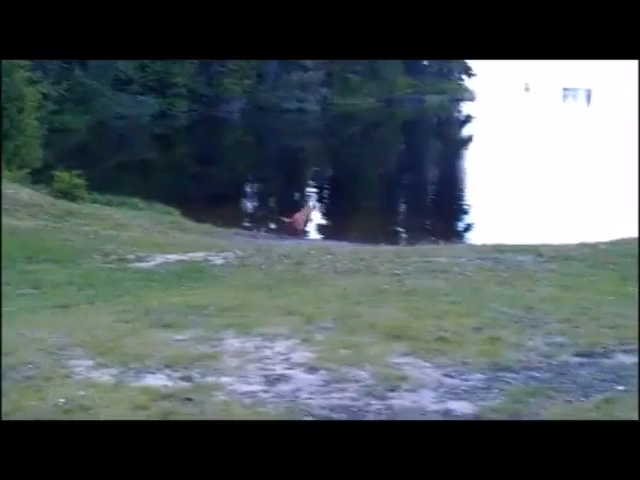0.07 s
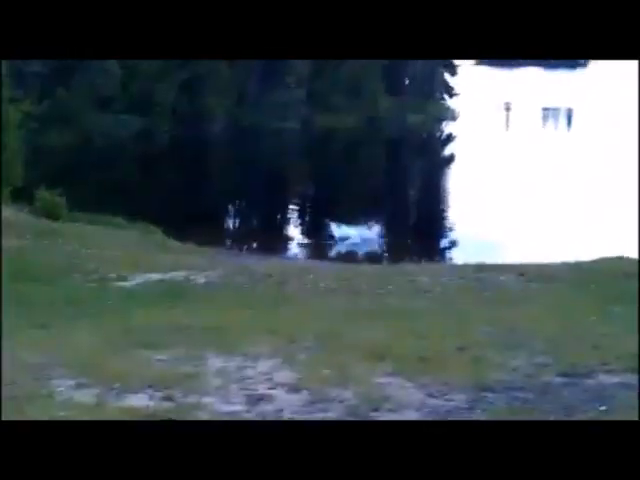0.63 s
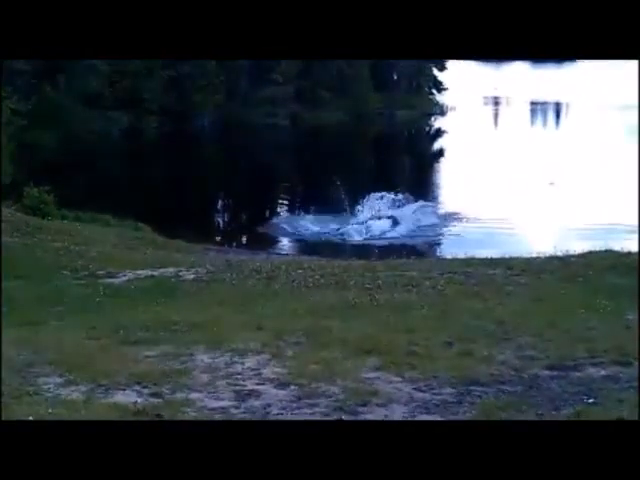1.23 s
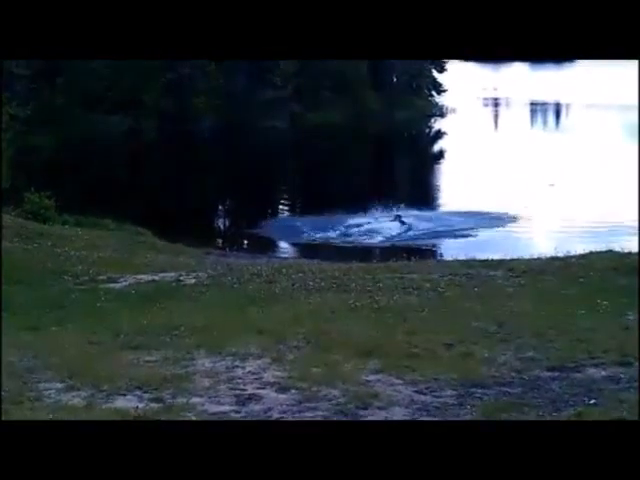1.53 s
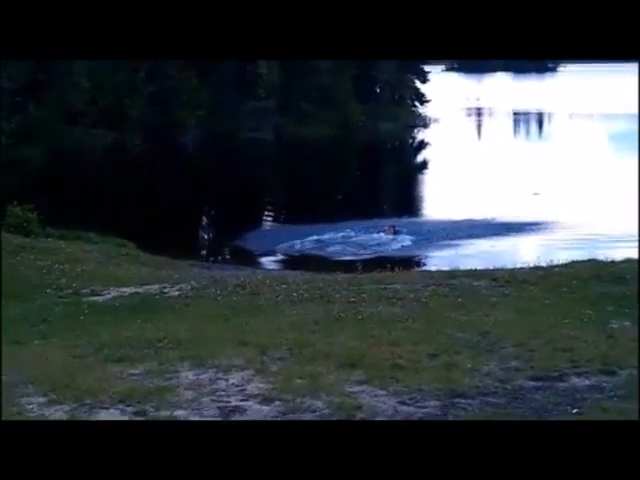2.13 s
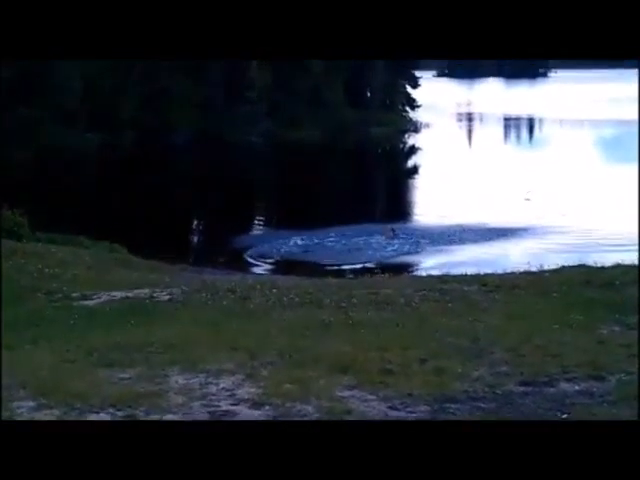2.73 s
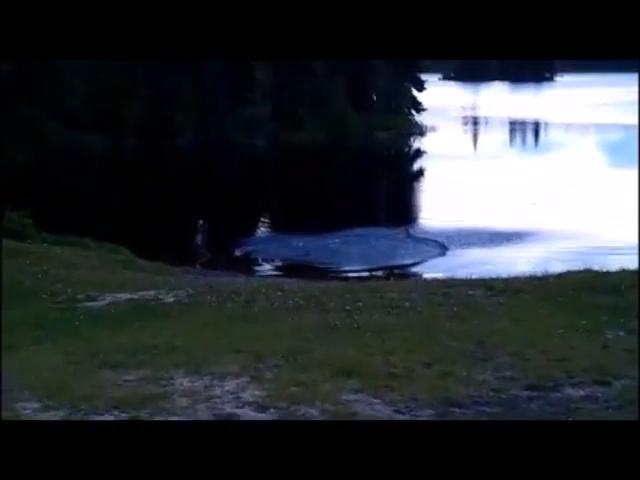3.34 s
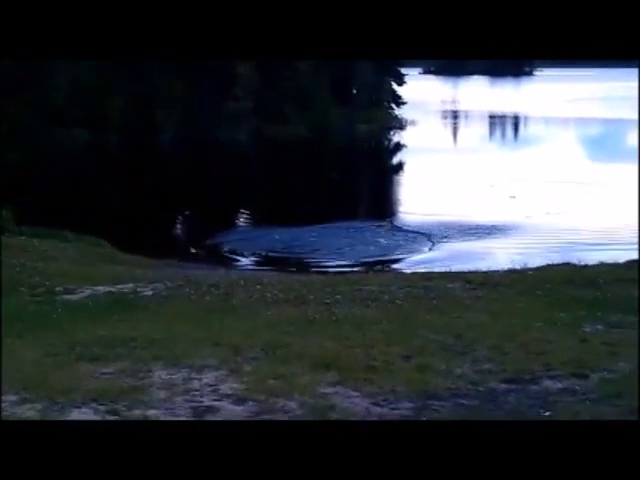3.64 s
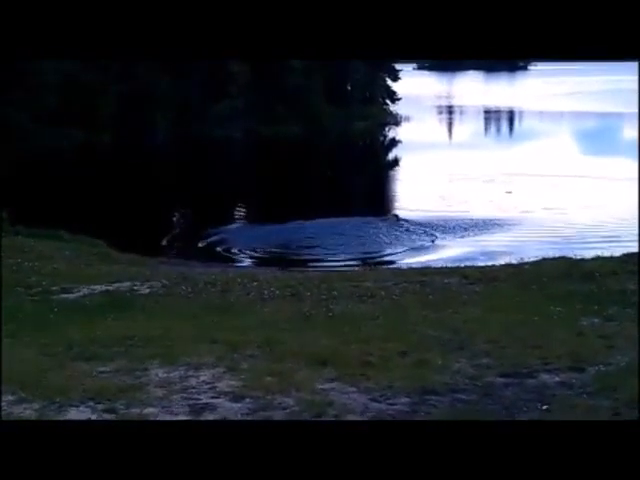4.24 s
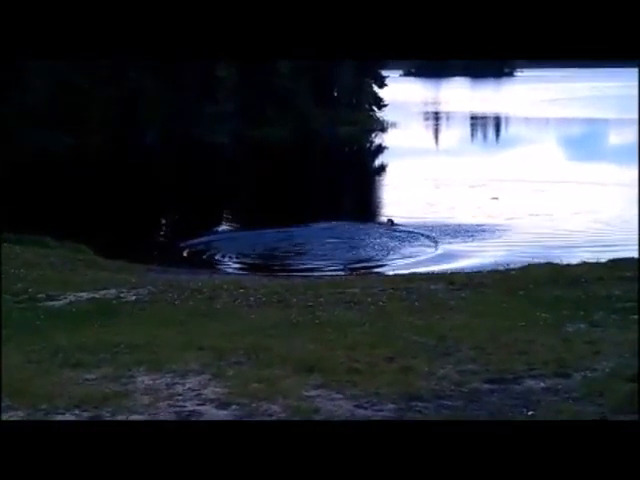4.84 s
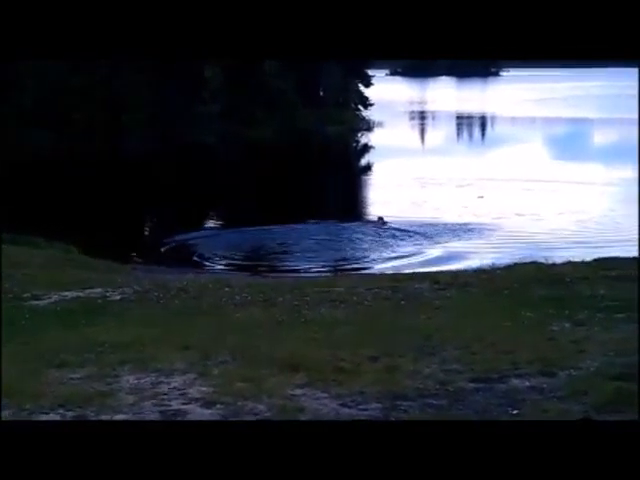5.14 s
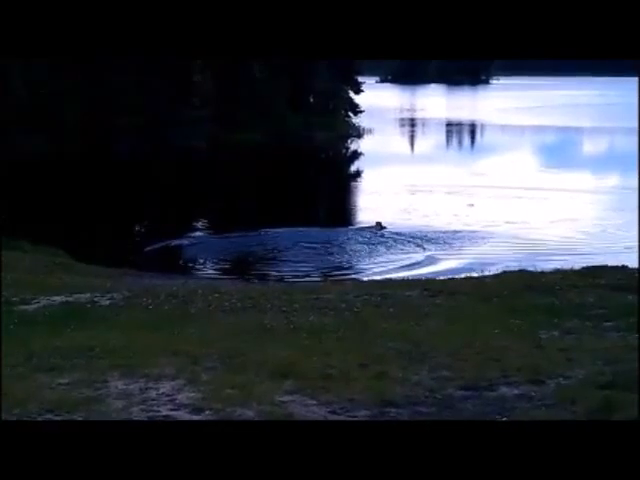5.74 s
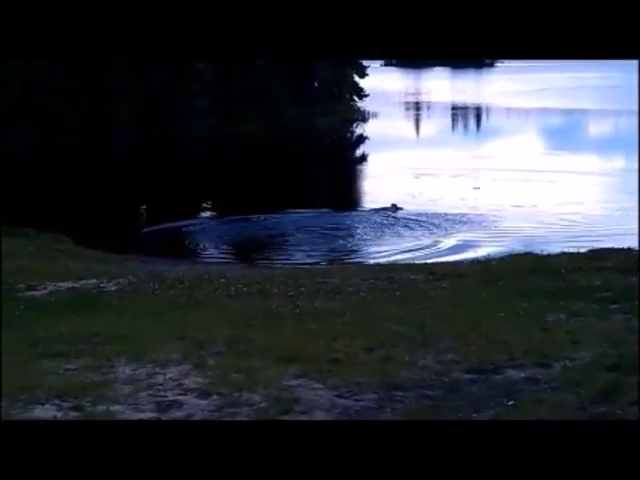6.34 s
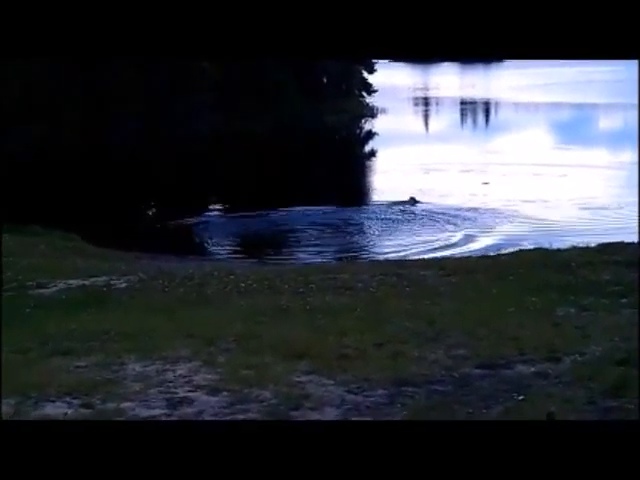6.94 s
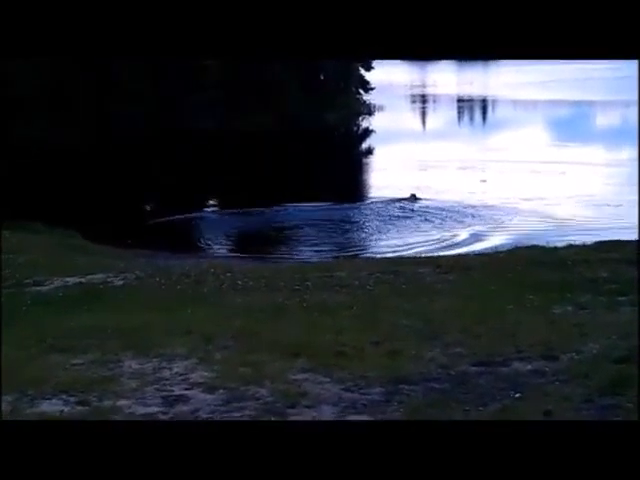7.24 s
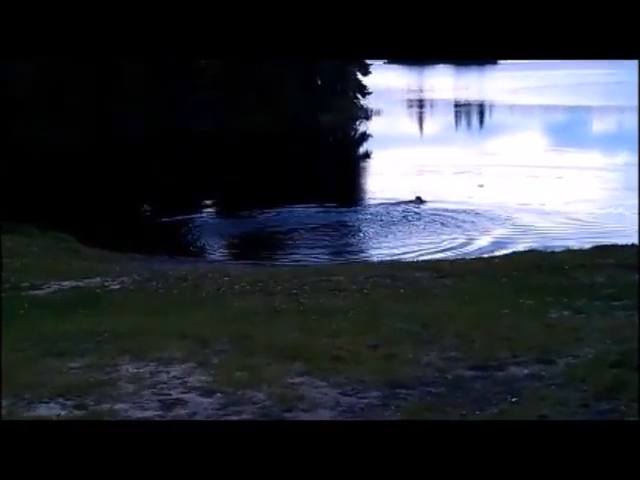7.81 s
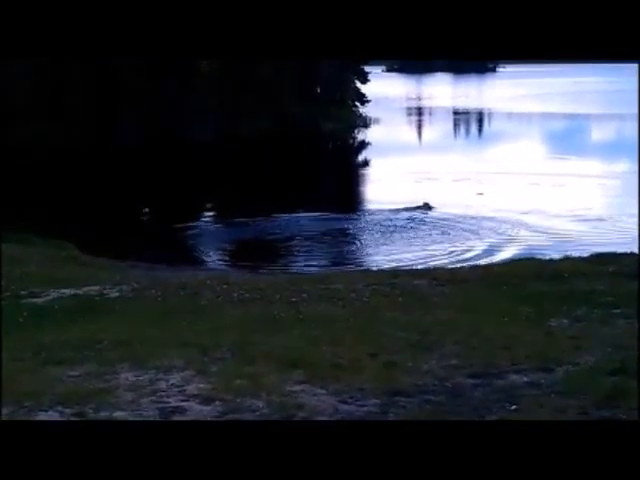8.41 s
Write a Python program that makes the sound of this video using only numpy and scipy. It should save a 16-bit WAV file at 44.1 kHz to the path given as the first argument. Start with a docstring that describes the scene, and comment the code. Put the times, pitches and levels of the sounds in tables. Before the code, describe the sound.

A very quiet outdoor hush lies over a lake, heard from the shore. In the first half second there are faint swishes and a drip or two as a dog runs through the shallows some way off. At about 0.8 seconds it hits the water with a quick cluster of slaps, followed by low, hollow gulps and gurgling. The thrown water rains back as bright spray, building from 1.4 seconds and loudest between 1.5 and 2 seconds, with a few sharp smacks. The spray and bubbling then thin out, and the level drops abruptly at about 2.7 seconds with a few last glugs. Drips and fizzing foam fade by 4 seconds. From around 3 seconds until the end, near 8.5 seconds, the dog swims away with faint, uneven paddling, soft ripples and scattered small, high plips and ticks.

```python
"""A dog leaps into a forest lake

Some way off, a dog bounds through the shallows and leaps. Its body slaps the surface and opens a gulping
cavity; the sheet of water it throws up rains back as spray. Each trapped bubble rings as a damped
oscillator, the smaller the higher. The level drops abruptly, and the dog swims off: soft paddling wash,
ripples and single plips over a very quiet outdoor hush."""
import sys
import numpy as np
from scipy import signal
from scipy.fft import rfft, irfft, next_fast_len
from scipy.io import wavfile
from scipy.ndimage import map_coordinates

SR = 44100
rng = np.random.default_rng(int(sys.argv[2]) if len(sys.argv) > 2 else 0)


def unload_audio(sound):
    """Save the sound as a 16-bit wav file, at the path given as the first command line argument."""
    columns = np.transpose(np.atleast_2d(sound))
    # keep every value between -1 and 1, then stretch to whole-number steps
    steps = np.round(np.clip(columns, -1, 1) * 32767)
    wavfile.write(sys.argv[1], SR, steps.astype(np.int16))


N = 373527
TIME = np.arange(N) / SR

# Spectra of still air, calm water and the splash. Each row: frequency in Hz, gain in dB.
HUSH_TONE = [(25, -15.5), (80, -20), (130, -41), (200, -24), (290, -4), (480, -2.5), (750, 3), (1100, -1.5),
             (2000, 0), (3000, -3), (4000, -4), (10500, -15.5)]
RIPPLE_TONE = [(150, -47.5), (230, -24), (310, -8.5), (540, -8), (770, 0.2), (980, -6.5), (1500, -6),
               (2080, -2.1), (3080, -9.5), (3950, -2.5), (6200, -9.5), (7700, -12), (8600, -12.5),
               (10500, -30.5)]
SPLASH_TONE = [(120, -50), (190, -28), (290, -11), (440, -10.5), (590, -4), (720, 1.2), (830, -0.6),
               (930, -8.5), (1550, -5.5), (2100, -0.5), (2500, -5), (2850, -6), (3090, -11.5), (3290, -5),
               (3900, -1), (5100, -3), (6100, -3.5), (6850, -6.5), (7400, -2.5), (7850, -10), (8250, -5.5),
               (9000, -9.5), (9500, -10.5), (10100, -20.5)]
# Likeness of the two microphone ports. Each row: frequency in Hz, correlation before scaling.
CORRELATION = [(300, 0.5), (750, 0.55), (1050, 0.55), (1650, 0.5), (2200, 0.77), (2800, 0.47), (3100, 0.07),
               (4400, 0.4), (5900, 0.43), (7800, -0.12), (9000, 0.48)]
# Imbalance of the ports. Each row: frequency in Hz, left minus right in dB.
BALANCE = [(300, 2), (1300, 3.2), (2900, 1.5), (3700, 5.7), (5000, 1.3), (6200, 0.5), (8000, 0.5)]
# Spray kicked up in the shallows. Each row: start in seconds, length in seconds, level in dB.
KICKS = [(0.269, 0.021, -68.5), (0.36, 0.11, -74)]
# Legs pushing water. Each row: start in seconds, length in seconds, wash in dB, fizz in dB.
STROKES = [(-0.03, 0.064, -72.5, -77.5), (0.243, 0.13, -76, -76), (0.367, 0.053, -71, -75),
           (3.18, 0.41, -73, -69), (3.508, 0.31, -69, -69), (3.83, 0.57, -68.5, -71.5),
           (4.624, 0.04, -78, -74), (4.795, 0.28, -68, -70.5), (5.173, 0.04, -73, -77),
           (5.273, 0.11, -67.5, -74.5), (5.41, 0.22, -69, -73.5), (5.854, 0.041, -69, -70.5),
           (6.044, 0.09, -69.5, -72), (6.22, 0.066, -71.5, -73.5), (6.37, 0.27, -71.5, -76),
           (6.837, 0.39, -70, -73.5), (7.415, 0.079, -68.5, -74), (7.754, 0.056, -69, -73),
           (7.912, 0.32, -66, -72), (8.24, 0.25, -69.5, -74.5)]
# Single drops and bursting bubbles. Each row: start in seconds, level in dB, pitch in Hz,
# spatter t60 in seconds, ring relative to spatter in dB.
PLIPS = [(0.228, -59.5, 1310, 0.027, -4), (0.6245, -58, 1690, .014, 6), (2.889, -46, 2180, .05, -4),
         (2.902, -51, 2000, .03, -6), (3.13, -55, 6700, .02, 14), (3.207, -50, 2000, .025, 10),
         (3.503, -46, 4000, 0.064, -4), (3.644, -49, 1950, 0.023, 6), (4.067, -51, 2260, .018, 5),
         (4.152, -50, 2310, 0.039, -2), (4.2975, -48, 3550, 0.0099, -13), (4.312, -50.5, 2860, .035, -4),
         (4.322, -54, 4280, .022, 1), (4.36, -52, 2370, .014, 3), (4.375, -53.5, 1750, .02, 18),
         (4.433, -56, 5000, .025, 5), (4.661, -48, 4410, .035, 17), (4.683, -56.5, 4600, .02, 14),
         (4.76, -55.5, 5130, .015, 14), (4.889, -55, 4230, .025, 9), (4.921, -52, 1740, .018, 8),
         (4.9325, -46.5, 1850, .03, 23), (4.937, -46.5, 3780, .018, 26), (4.956, -53, 4100, .015, 5),
         (5.031, -53, 2290, .014, -9), (5.1482, -50.5, 4640, .011, 3), (5.1515, -50.5, 4040, .015, 14),
         (5.272, -53, 1900, 0.016, 6), (5.279, -52, 4700, .017, 8), (5.331, -51, 3600, .026, -5),
         (5.379, -55, 2600, .018, -2), (5.589, -59, 2090, .02, 6), (5.598, -55, 1910, .02, 0),
         (5.61, -53, 3730, .02, 12), (5.748, -61, 4200, .05, 0), (5.869, -57, 4680, .025, 14),
         (5.8984, -54.5, 4500, .035, -5), (5.925, -56, 4500, .04, 7), (6.089, -55, 3950, .02, 14),
         (6.131, -55, 3410, .02, 12), (6.246, -57, 2920, .025, 10), (6.344, -56, 4560, .02, 16),
         (6.5146, -48, 3200, 0.026, -13), (6.529, -53, 2610, 0.022, 4), (6.603, -54, 3770, .019, 5),
         (6.894, -53.5, 2530, .025, 16), (7.0115, -50, 1950, .02, 27), (7.168, -54, 1990, .02, 20),
         (7.208, -52, 4660, .014, 9), (7.225, -56, 5000, .014, 10), (7.457, -54.5, 2280, .02, 18),
         (7.748, -53, 2370, .02, 8), (7.753, -48.5, 3400, .034, 5), (7.7807, -50.5, 3570, .03, 12),
         (8.1467, -52.5, 1250, .016, 6.5), (8.204, -55, 2010, .02, 14.5), (8.4253, -52.5, 4500, .03, 8.5)]
# Air pockets closing. Each row: start in seconds, level in dB, pitch in Hz, relative ring in dB.
GLUGS = [(0.885, -35.5, 625, 15), (0.973, -37, 800, 10), (1.32, -41, 715, 17), (1.666, -32.5, 710, 14),
         (1.748, -39, 482, 8), (2.685, -40, 806, 13), (2.707, -44, 692, 16), (2.797, -51.5, 704, 7),
         (2.946, -48.5, 790, 19), (3.022, -54, 715, 21), (5.344, -59, 760, 12), (7.014, -61, 670, 14),
         (7.13, -63, 700, 12), (7.808, -62, 652, 14), (8.109, -62, 850, 11.5)]
# Deep gulps of the cavity. Each row: start in seconds, level in dB.
GULPS = [(0.785, -74), (0.875, -54.5), (0.94, -52), (1.045, -53), (1.115, -49), (1.18, -56), (1.36, -55),
         (1.73, -59), (1.935, -53)]
# Envelope of the gurgling in churned water. Each row: time in seconds, level in dB.
GURGLE = [(0.785, -68.5), (0.86, -56), (0.885, -46), (0.92, -50.5), (0.96, -44), (1.1, -50), (1.3, -53.5),
          (1.45, -47.5), (1.62, -44), (1.82, -43.5), (1.92, -38), (2.0, -42.5), (2.1, -46), (2.19, -41.5),
          (2.26, -47.5), (2.7, -56)]
# Envelope of thrown water falling back. Each row: time in seconds, level in dB.
SPRAY = [(0.795, -51.5), (0.93, -45.5), (1.1, -49.5), (1.3, -46.5), (1.47, -38), (1.59, -34), (1.69, -36),
         (1.87, -29.5), (1.97, -29), (2.03, -32), (2.07, -37.5), (2.3, -42.5), (2.707, -50)]
# Slabs of water landing. Each row: start in seconds, level in dB, pitch in Hz, relative ring in dB.
SMACKS = [(1.560, -9, 6240, 17), (1.577, -23, 4010, 0), (1.745, -21, 5600, -2.5), (1.971, -13.5, 6000, 12)]
# Paws and chest hitting the lake. Each row: start in seconds, level in dB, thrown spray in dB.
BLOWS = [(0.779, -50.5, -60), (0.822, -31, -43), (0.868, -28, -38), (0.89, -34, -40.5), (0.971, -24.5, -46),
         (1.003, -31, -57)]

SPLASH_SPAN_S = (.7, 2.85)
LEVEL_DROP_S = SPRAY[-1][0]  # the whole sound abruptly drops in level
SPRAY_EDGE_S = 0.0087  # fade at either end of the spray's envelope


def amp(db):
    """Amplitude ratio of a level in decibels."""
    return 10 ** (np.asarray(db) / 20)


def unit(x):
    """Normalisation to an rms of 1."""
    return x / np.sqrt(np.mean(x ** 2) + 1e-20)


def along(points, hz):
    """Interpolation of (Hz, value) points on a logarithmic frequency axis."""
    freqs, values = np.transpose(points)
    return np.interp(np.log(hz + 1), np.log(freqs + 1), values)


def band(hz, low_hz, high_hz, order=8):
    """Magnitude response of a maximally flat band-pass."""
    return ((1 + (low_hz / (hz + 1)) ** (2 * order)) * (1 + (hz / high_hz) ** (2 * order))) ** -.5


def filtered(x, response):
    """Minimum-phase filtering: folding the cepstrum makes a magnitude response causal."""
    size = 2 * next_fast_len(N // 2 + 8192)
    magnitude = np.maximum(response(np.fft.rfftfreq(size, 1 / SR)), 1e-6)
    cepstrum = irfft(np.log(magnitude), size)
    cepstrum[1:size // 2] *= 2
    cepstrum[size // 2 + 1:] = 0
    return irfft(rfft(x, size) * np.exp(rfft(cepstrum)), size)[..., :N]


def ports(pair, tone, focus):
    """Mid-side stereo: two signals form left and right, with a correlation scaled by focus."""
    turn = lambda hz: np.arccos(np.clip(focus * along(CORRELATION, hz), -.99, .99)) / 2
    mid = filtered(pair[0], lambda hz: tone(hz) * np.cos(turn(hz)))
    side = filtered(pair[1], lambda hz: tone(hz) * np.sin(turn(hz)))
    return np.array([mid + side, mid - side]) / np.std(mid)


def noise(tone, focus):
    """Spectral shaping of white noise, partly correlated between the ports."""
    return ports(rng.standard_normal((2, N)), tone, focus)


def together(gains):
    """Incoherent addition: the powers of unrelated sounds add."""
    return np.sqrt(sum(gain ** 2 for gain in gains))


def swell(start_s, attack_s, hold_s, t60_s):
    """An envelope that rises linearly and, from hold_s after its start, decays exponentially."""
    age = TIME - start_s
    return np.clip(age / attack_s, 0, 1) * amp(-60 * np.maximum(age - hold_s, 0) / t60_s)


def afterwards(fade_db_per_s):
    """An exponential decay that takes over where the whole sound abruptly drops in level."""
    age = TIME - LEVEL_DROP_S
    return np.clip(1 + age / 0.09, 0, 1) * amp(-fade_db_per_s * np.maximum(age, 0))


def hollow():
    """Envelope of the cavity, which opens as the body goes in and slowly fills."""
    return swell(BLOWS[1][0], attack_s=0.038, hold_s=1.38, t60_s=3.2)


def shower():
    """Envelope of falling water, 1 in a heavy shower: spurts from the blows add in power to the sheet."""
    times, levels_db = np.transpose(SPRAY)
    outside_s = np.abs(TIME - np.clip(TIME, times[0], times[-1]))
    sheet = amp(np.interp(TIME, times, levels_db)) * np.exp(-(outside_s / SPRAY_EDGE_S) ** 2)
    spurts = [amp(db) * swell(start, attack_s=0.002, hold_s=0.0035, t60_s=0.2) for start, _, db in BLOWS]
    return together([sheet] + spurts) / amp(-30)


def bubbles(span, rate, low_hz, high_hz, cycles, spread_db, rise=0.17):
    """Bubble resonance: mid and side of damped sines whose pitch rises as they near the surface."""
    length_s = span[1] - span[0]
    count = int(rate * length_s)
    when, pitch, life, size, angle = rng.random((count, 5)).T[..., None]
    hz = low_hz + (high_hz - low_hz) * pitch
    t60 = cycles * (.5 + life) / hz
    t = np.arange(min(int(t60.max() * SR), 4000000 // count)) / SR
    strength = amp(-spread_db * np.log(size + 0.0037)) / np.sqrt(t60)
    envelope = strength * amp(-60 * t / t60)
    phase = 2 * np.pi * hz * t * (1 + rise * t / t60)
    samples = ((span[0] + when * length_s) * SR).astype(int) + np.arange(len(t))
    waves = [envelope * np.sin(phase), envelope * np.sin(phase + 2 * np.pi * angle)]
    swarm = np.array([np.bincount(samples.ravel(), wave.ravel(), N)[:N] for wave in waves])
    return unit(swarm) * np.sqrt(length_s * SR / N)


def water(low_hz, high_hz, rate, cycles, spread_db, blur_db, focus, span=SPLASH_SPAN_S, tone=SPLASH_TONE):
    """Superposition: rate bubbles a second stand out from countless weaker ones that blur into noise."""
    swarm = bubbles(span, rate, low_hz, high_hz, cycles, spread_db)
    blur = amp(blur_db) * rng.standard_normal((2, N)) * np.sqrt(SR / 2 / (high_hz - low_hz))
    sound = ports(swarm + blur, lambda hz: amp(along(tone, hz)) * band(hz, low_hz, high_hz), focus)
    return sound / np.std(sound.mean(0)[int(span[0] * SR):int(span[1] * SR)])


def impacts(rows, tone, swell_s, cycles, width_octaves, rise, direct):
    """Impact and air entrainment: a burst of spatter and the gliding ring of a trapped bubble."""
    out = np.zeros((2, N + SR))
    t = np.arange(SR // 8) / SR
    hz = np.fft.rfftfreq(len(t), 1 / SR) + 1
    for start, db, pitch_hz, t60, ring_db in rows:
        colour = amp(along(tone, hz)) / (1 + (np.log2(hz / pitch_hz) / width_octaves) ** 2)
        spatter = unit(irfft(rfft(rng.standard_normal((2, len(t)))) * colour, len(t)))
        attack_s = swell_s + 0.07 * t60  # a long spatter also builds slowly
        spatter *= amp(-60 * t / t60) * (1 - np.exp(-t / attack_s))
        age = t * pitch_hz / cycles
        ring = np.sin(2 * np.pi * pitch_hz * t * (1 + rise * age)) * amp(-60 * age)
        onset = 1 - np.exp(-(t * pitch_hz / 1.2) ** 2)  # swells over about one cycle
        mid = (spatter[0] + amp(ring_db) * ring) * onset
        side = spatter[1] * onset * np.sqrt(1 - direct)
        stereo = np.array([mid + side, mid - side]) / np.abs(mid).max()
        out[:, round(start * SR):][:, :len(t)] += amp(db) * stereo
    # keep the impacts light and free of bass, about 250-9500 Hz
    return filtered(out[:, :N], lambda f: band(f, 250, 9500, order=5))


def hush():
    """Stationary noise: still air over the lake and the forest."""
    return amp(-73) * noise(lambda hz: amp(along(HUSH_TONE, hz)), focus=0.41)


def rumble():
    """Displaced water radiates faint low noise, with a soft thump under the heaviest smack."""
    rise_s = .035
    thump = amp(-79) * swell(SMACKS[0][0] - rise_s, rise_s, hold_s=rise_s, t60_s=.12)
    low = noise(lambda hz: band(hz, 20, 85, order=2), focus=1.4)
    return together([amp(-101) * hollow(), thump]) * low


def wading():
    """Running legs flick up fine spray, whose droplets merge into swishes of high noise."""
    gain = together(amp(db) * swell(start, attack_s=0.016, hold_s=length, t60_s=0.17)
                    for start, length, db in KICKS)
    return gain * noise(lambda hz: amp(along(SPLASH_TONE, hz)) * band(hz, 4300, 9100), focus=.8)


def trickle():
    """Drips and bursting foam decay exponentially after the drop in level."""
    span = (2.65, 4.1)
    drips = water(652, 2710, rate=280, cycles=46, spread_db=-2, blur_db=-2.5, focus=0.99, span=span)
    foam = water(2900, 9800, rate=480, cycles=26, spread_db=2.5, blur_db=3.5, focus=1, span=span)
    return afterwards(fade_db_per_s=18) * (amp(-60.5) * drips + amp(-58.5) * foam)


def lapping(rate_hz=9, depth_db=0.76):
    """Random amplitude modulation as wavelets come and go."""
    knots = rng.standard_normal(int(rate_hz * N / SR) + 4)
    return amp(depth_db * map_coordinates(knots, [TIME * rate_hz]))


def paddling():
    """Each stroke stirs a low wash and high fizz, which add in power to the fading wake of the leap."""
    # a longer push builds more slowly
    stirs = [(swell(start, attack_s=0.022 + 0.18 * length, hold_s=length, t60_s=1), wash_db, fizz_db)
             for start, length, wash_db, fizz_db in STROKES]
    stirs.append((afterwards(fade_db_per_s=3.5), -65.5, -69))  # the wake
    wash_gain = together(amp(db) * envelope for envelope, db, _ in stirs)
    fizz_gain = together(amp(db) * envelope for envelope, _, db in stirs)
    calm = dict(span=(0, N / SR), tone=RIPPLE_TONE)
    wash = water(182, 3270, rate=520, cycles=22, spread_db=2.5, blur_db=1, focus=1.09, **calm)
    fizz = water(2920, 6300, rate=220, cycles=26, spread_db=3, blur_db=3, focus=1.2, **calm)
    sheen = noise(lambda hz: amp(along(RIPPLE_TONE, hz)) * band(hz, 6300, 11900), focus=0.78)
    return wash_gain * wash + fizz_gain * (fizz + amp(-7.5) * sheen) * lapping()


def plips():
    """Single drops and bursting bubbles excite brief resonances that rise slightly in pitch."""
    return impacts(PLIPS, RIPPLE_TONE, swell_s=0.00032, cycles=21.4,
                   width_octaves=1.5, rise=0.063, direct=0.67)


def glugs(spatter_t60_s=0.079):
    """Larger air pockets resonate lower as they close, here with a slightly falling pitch."""
    rows = [(start, db, hz, spatter_t60_s, ring_db) for start, db, hz, ring_db in GLUGS]
    return impacts(rows, RIPPLE_TONE, swell_s=0.00074, cycles=23,
                   width_octaves=1, rise=-0.059, direct=0.97)


def cavity():
    """The hollow behind the body gulps in low bubble resonances; the largest bubbles come first."""
    deep_gain = amp(-64) * swell(BLOWS[2][0], attack_s=0.0097, hold_s=0.44, t60_s=2)
    gulps = [amp(db) * swell(start, attack_s=0.006, hold_s=0.019, t60_s=0.17) for start, db in GULPS]
    gulp_gain = together([amp(-58.5) * hollow()] + gulps)
    deep = water(120, 317, rate=250, cycles=7.3, spread_db=5.5, blur_db=-0.5, focus=2.2)
    gulping = water(210, 540, rate=510, cycles=11, spread_db=-0.4, blur_db=2, focus=1.5)
    return deep_gain * deep + gulp_gain * gulping


def churn(flow, lag_s=0.028):
    """Air beaten into the water gurgles; its smaller bubbles trail the spray with a first-order lag."""
    pole = np.exp(-1 / (lag_s * SR))
    small_gain = amp(-36) * signal.lfilter([1 - pole], [1, -pole], flow ** 0.8)
    onset = np.clip((TIME - BLOWS[0][0]) / SPRAY_EDGE_S, 0, 1)
    gurgle_gain = amp(np.interp(TIME, *np.transpose(GURGLE))) * onset
    gurgle = water(520, 919, rate=450, cycles=22, spread_db=1.36, blur_db=-1, focus=1.6)
    small = water(936, 2905, rate=1400, cycles=15, spread_db=2, blur_db=-2, focus=1.16)
    return gurgle_gain * gurgle + small_gain * small


def spray(flow):
    """Large drops, small drops and mist rain back, each following a power law of the flow."""
    large = water(2890, 4760, rate=1500, cycles=29, spread_db=4, blur_db=5, focus=1.4)
    small = water(4650, 7900, rate=1900, cycles=29, spread_db=4.5, blur_db=2, focus=1.9)
    mist = water(8000, 9400, rate=2400, cycles=8.9, spread_db=4.5, blur_db=-2.5, focus=1)
    mist_gain = amp(np.interp(TIME, (0.77, 1.8), (-42, -41.5))) * flow ** 0.8
    fine = amp(-31.5) * flow ** 0.94 * small + mist_gain * mist
    thinning = amp(np.interp(TIME, (2, 2.21), (0, -4)))  # fine spray thins out after the crest
    return amp(-33) * flow * large + thinning * fine


def splash():
    """Superposition of bubbling and spray, both cut short by the sudden drop in level."""
    flow = shower()
    ending = swell(0, attack_s=.5, hold_s=LEVEL_DROP_S, t60_s=0.14)
    return ending * (cavity() + churn(flow)) + spray(flow)


def smacks(spatter_t60_s=0.0082):
    """Slabs of water land as sharp impulses, trapping small bubbles that chirp upward."""
    rows = [(start, db, hz, spatter_t60_s, ring_db) for start, db, hz, ring_db in SMACKS]
    return impacts(rows, SPLASH_TONE, swell_s=0.00024, cycles=20,
                   width_octaves=0.91, rise=0.24, direct=0.65)


def blows(pitch_hz=5050, spatter_t60_s=0.0066, ring_db=-1):
    """Paws and chest slap the lake: a brief impact has a broad, bright spectrum."""
    rows = [(start, db, pitch_hz, spatter_t60_s, ring_db) for start, db, _ in BLOWS]
    return impacts(rows, SPLASH_TONE, swell_s=0.0003, cycles=29, width_octaves=1, rise=0.096, direct=0.69)


def scene():
    """Linear superposition of all the water sounds and the hush."""
    bed = wading() + splash() + rumble() + trickle() + paddling() + hush()
    return bed + blows() + smacks() + glugs() + plips()


def record(dry):
    """Microphone response: each port colours the sound, with a band limit and a tiny steady offset."""
    left = filtered(dry[0], lambda hz: amp(along(BALANCE, hz) / 2))
    right = filtered(dry[1], lambda hz: amp(-along(BALANCE, hz) / 2))
    passband = band(np.fft.rfftfreq(N, 1 / SR), low_hz=0.91, high_hz=10400, order=50)
    return 5e-5 + irfft(rfft([left, right]) * passband, N)


dry = scene()
out = record(dry)
unload_audio(out)
```